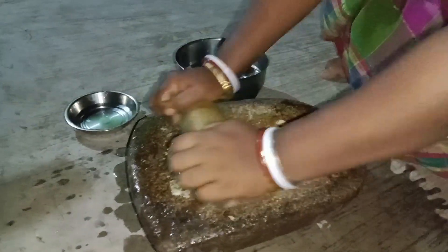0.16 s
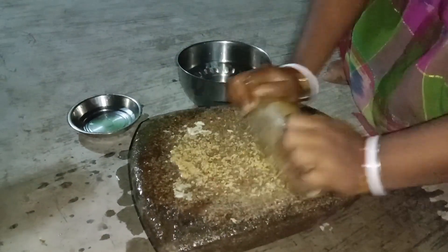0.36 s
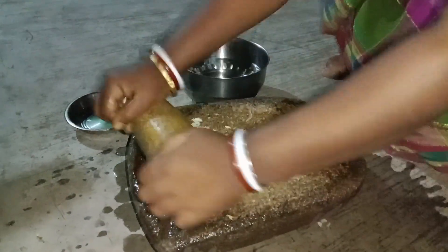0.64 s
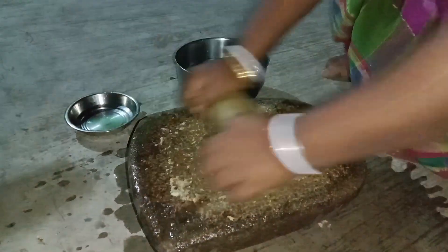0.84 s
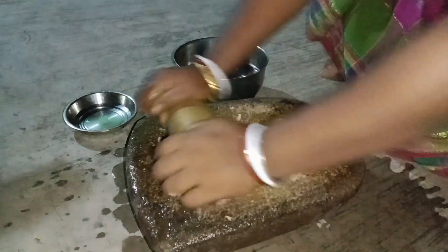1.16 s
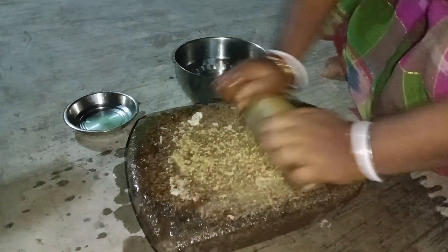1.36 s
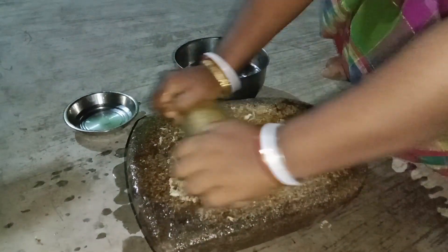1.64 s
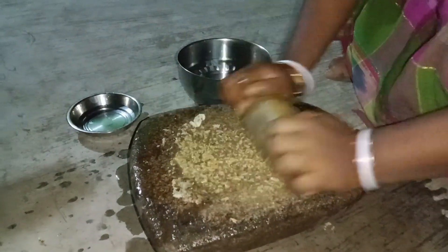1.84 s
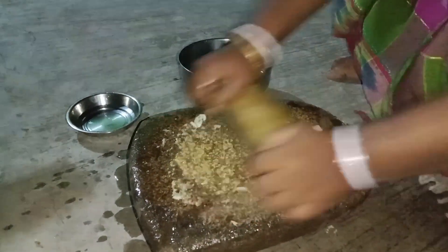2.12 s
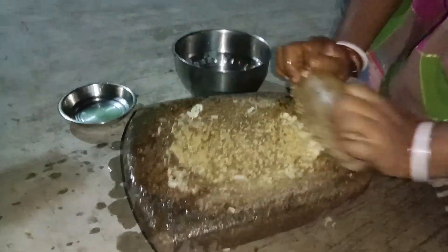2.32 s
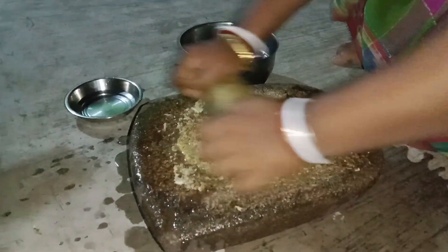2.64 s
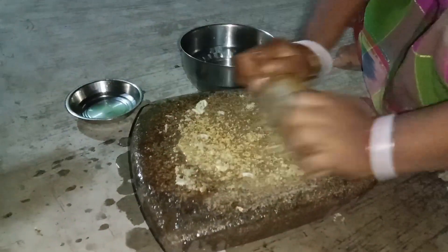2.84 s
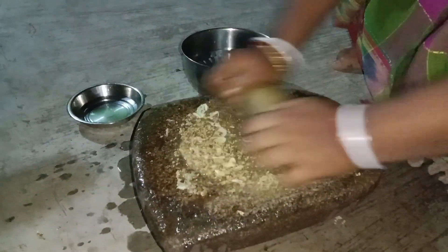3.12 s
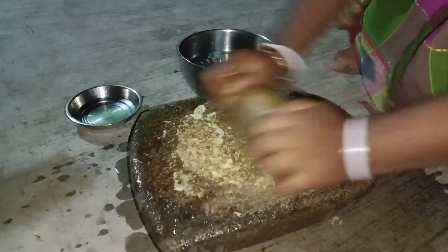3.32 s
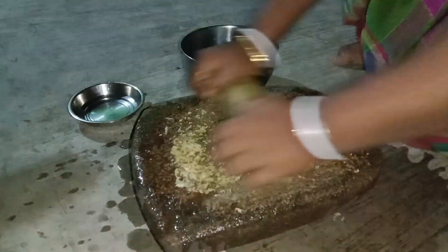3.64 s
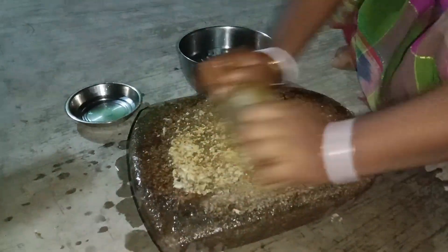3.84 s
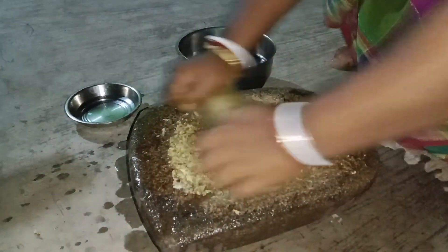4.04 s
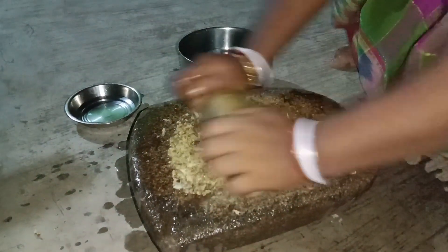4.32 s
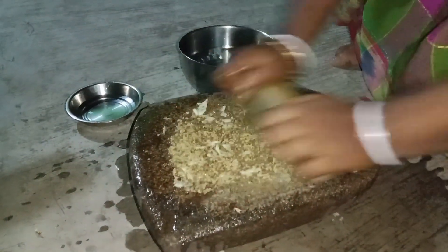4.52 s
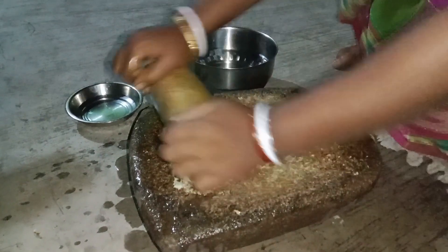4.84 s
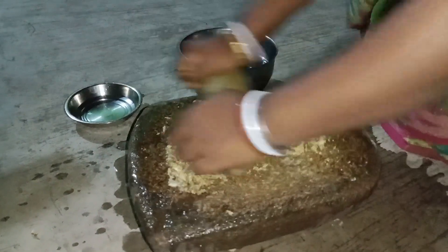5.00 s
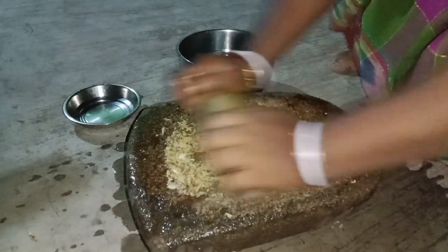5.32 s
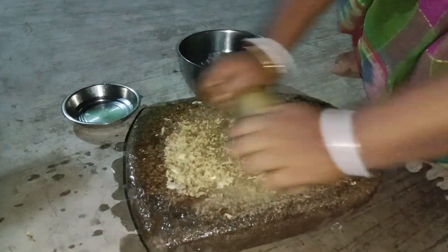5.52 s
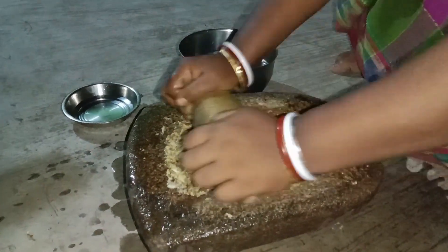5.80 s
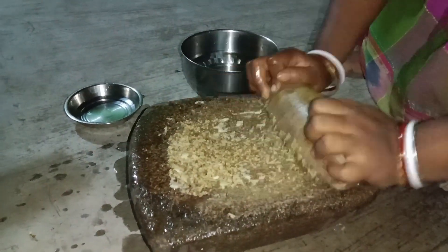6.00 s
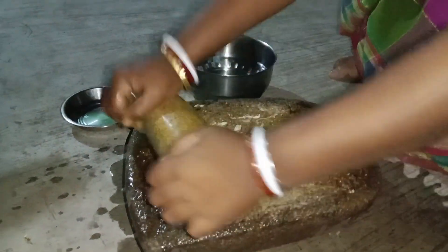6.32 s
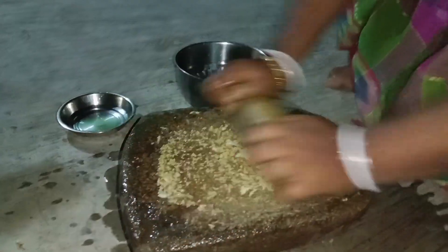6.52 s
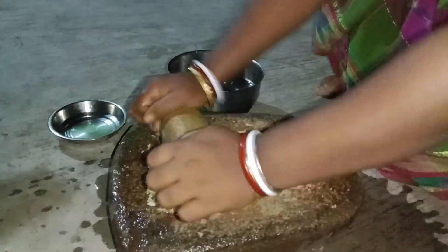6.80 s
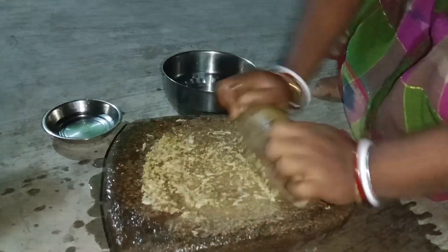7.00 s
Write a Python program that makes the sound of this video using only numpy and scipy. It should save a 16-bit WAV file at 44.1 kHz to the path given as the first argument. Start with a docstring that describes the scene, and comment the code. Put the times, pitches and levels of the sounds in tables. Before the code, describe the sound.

Hand grinding on stone, heard near and almost mono: short pushes and lighter pulls alternate, each a moist scrape with crunching grit and, on firm strokes, a low rumble. Hard knocks mark the roller landing, followed by dull thumps from the rocking slab. One longer groaning drag appears near the beginning, then scattered skids and a tiny bright bangle clink. Dry little room, quiet gaps, slightly muffled top.

```python
'''A small room with a hard floor, where a stone roller goes back and forth over a slab, crushing damp spices.
Each push swells, holds while the weight changes, and dies: noise and tiny clicks ring through colours
for hissing paste, crunching grit and rumbling slab. Knocks, skids and one long drag are noisy stone contacts.
The slab thumps as a short low tone, and bangles clink as a few fading high tones.
Faint hiss and a short echo surround it; a noise suppressor turns weak bands down.'''
import sys
import numpy as np
from scipy import signal
from scipy.fft import rfft, irfft
from scipy.io import wavfile
from scipy.ndimage import uniform_filter1d

SR = 44100
rng = np.random.default_rng(int(sys.argv[2]) if len(sys.argv) > 2 else 0)


def digitize_waveform(pressure):
    """Quantize a signal to 16-bit integers and store it at the path in sys.argv[1].

    Rows of a 2-D input are taken as channels; values are limited to [-1, 1].
    """
    field = np.atleast_2d(pressure).T
    bounded = np.clip(field, -1, 1)
    quanta = np.round(bounded * 32767).astype(np.int16)
    wavfile.write(sys.argv[1], SR, quanta)


N = 315756  # length in samples


def gain_of(db):
    """Turns decibels into a plain multiplier."""
    return 10 ** (np.asarray(db) / 20)


def evened(x):
    """Scales a sound to rms 1."""
    return x / np.sqrt(np.mean(x ** 2) + 1e-20)


def read(points, hz):
    """Reads a curve by straight lines between its points on a log-frequency axis."""
    f, value = np.transpose(points)
    return np.interp(np.log(hz + 1), np.log(f + 1), value)


def add(mix, s, sound):
    """Lays a sound into the mix at time s, in seconds."""
    start = max(round(s * SR), 0)
    part = mix[start:][:len(sound)]
    part += sound[:len(part)]


def response(colour, modes=(), size=8192):
    """Ring of a struck body with a broad colour and narrow resonances; it never starts before the blow."""
    hz = np.fft.rfftfreq(size, 1 / SR)
    db = read(colour, hz)
    for centre, width, height in modes:
        peak_power = gain_of(abs(height)) ** 2 - 1
        db = db + 10 * np.log10(1 + peak_power / (1 + (2 * (hz - centre) / width) ** 2))
    # folding the cepstrum packs the energy as early as it can be (minimum phase)
    cepstrum = irfft(np.log(gain_of(np.maximum(db, -100))))
    cepstrum[1:size // 2] *= 2
    cepstrum[size // 2 + 1:] = 0
    ring = irfft(np.exp(rfft(cepstrum)))[:size // 2]
    return ring / np.linalg.norm(ring)


def ring_through(drive, ring):
    """Lets a drive excite a body; the result has rms 1."""
    return evened(signal.oaconvolve(drive, ring)[:N])


def wobble(rate_hz):
    """Smooth chance of rms 1, fading out above the rate."""
    hz = np.fft.rfftfreq(N, 1 / SR)
    spectrum = rfft(rng.standard_normal(N)) * np.exp(-(hz / rate_hz) ** 2)
    return evened(irfft(spectrum, N))


def grains(per_s, spread_db, smooth_share):
    """Tiny fractures of very unequal size over a bed of smooth rubbing."""
    size = gain_of(spread_db * np.minimum(rng.exponential(1, N), 4))
    clicks = size * rng.choice([-1, 1], N) * (rng.random(N) < per_s / SR)
    share = np.clip(smooth_share, 0, 1)
    return np.sqrt(1 - share) * evened(clicks) + np.sqrt(share) * rng.standard_normal(N)


def wander(x, depth_db, patch_hz, patch_s, size=1024):
    """As the point of contact moves, it feeds some modes and starves others."""
    overlap = size * 3 // 4
    hz, t, z = signal.stft(x, SR, nperseg=size, noverlap=overlap)
    across, along = np.fft.fftfreq(len(hz), hz[1])[:, None], np.fft.fftfreq(len(t), t[1])
    blur = np.exp(-(across * patch_hz * 2) ** 2 - (along * patch_s * 2) ** 2)
    patches = evened(np.fft.ifft2(np.fft.fft2(rng.standard_normal(z.shape)) * blur).real)
    moved = z * gain_of(depth_db * patches)
    # each moment keeps its power
    moved *= np.linalg.norm(z, axis=0) / (np.linalg.norm(moved, axis=0) + 1e-20)
    return signal.istft(moved, SR, nperseg=size, noverlap=overlap)[1][:N]


def push(rise_s, hold_s, level_db, easing_db, rise_power, t60_s):
    """Strength of one hand movement: it builds, holds while the weight eases, and dies by 60 dB in t60_s."""
    rise_s, hold_s = max(rise_s, 1 / SR), max(hold_s, 1 / SR)
    t = np.arange(0, rise_s + hold_s + t60_s, 1 / SR)
    held = gain_of(level_db - easing_db * np.clip((t - rise_s) / hold_s, 0, 1))
    release = np.exp(-np.log(1000) * np.maximum(t - rise_s - hold_s, 0) / t60_s)
    return np.minimum(t / rise_s, 1) ** rise_power * held * release


def chatter(ring, hold_s, fall_s, size=3000):
    """One knock: a few milliseconds of rattling contact; its loudest moment has rms 1."""
    t = np.arange(size) / SR
    contacts = rng.standard_normal(size) * gain_of(5.4 * rng.standard_normal(size))
    strength = np.exp(-np.maximum(t - hold_s, 0) / fall_s)
    sound = signal.fftconvolve(contacts * strength, ring)
    return sound / np.sqrt(uniform_filter1d(sound ** 2, size=200).max())


def background():
    """A very faint hiss, strongest around 100 Hz and the microphone's treble peak."""
    # pitch_hz, level_db (relative)
    colour = [(30, -13.5), (100, 2.0), (300, -13.5), (1000, -16.5), (3200, -22.0), (4800, -39.5),
              (6000, -15), (7400, 0.5), (9300, -15), (12000, -18.5), (15500, -33.5)]
    return gain_of(-74.0) * ring_through(rng.standard_normal(N), response(colour))


# Pushes and pulls of the roller; a negative easing means the weight grows over the hold:
# [start_s, rise_s, hold_s, paste_db, grit_db, rumble_db, easing_db]
ROLLER_STROKES = [(0.0, 0.001, 0.032, -49.5, -47.5, -57, 9.5), (0.118, 0.065, 0.059, -58, -68.5, -78.5, -5),
                  (0.321, 0.052, 0.065, -47, -46.5, -38.5, 8.5), (0.509, 0.033, 0.13, -56, -69, -60.5, 10),
                  (0.646, 0.026, 0.057, -53, -60.5, -70, 0.5), (0.787, 0.021, 0.11, -67.5, -91, -90, 0),
                  (.94, 0.011, 0.056, -56.5, -57, -70.5, 14), (1.04, .02, 0.035, -71.5, -98, -97.5, -4),
                  (1.153, 0.032, 0.071, -48.5, -50, -44.5, 3), (1.264, .03, 0.023, -54, -58.5, -42.5, 2.5),
                  (1.329, 0.074, .26, -47, -51.5, -44.5, -2), (1.646, 0.029, 0.084, -56, -84, -39, 3),
                  (1.763, 0.018, 0.097, -45, -38.5, -32.5, 16.5),
                  (1.966, 0.045, 0.064, -50, -49, -41.5, 13.5),
                  (2.191, 0.064, 0.051, -53.5, -67, -65.5, -1), (2.282, 0.06, 0.09, -54.5, -72, -47, 29),
                  (2.479, 0.083, 0.083, -47, -46.5, -65, -3.5), (2.629, 0.025, 0.021, -60, -62.5, -48.5, 5),
                  (2.763, 0.048, 0.088, -50, -56, -83, -1.5), (2.97, 0.08, 0.024, -49, -49, -58.5, -6),
                  (3.16, 0.034, 0.077, -47, -35.5, -33.5, 22.5), (3.394, 0.045, 0.054, -49, -50.5, -38, 12),
                  (3.523, 0.034, 0.046, -69, -81, -77.5, 5), (3.687, 0.027, 0.14, -66.5, -72, -85, 11),
                  (3.945, 0.061, 0.077, -53, -59.5, -63, -0.5), (4.067, 0.038, 0.044, -52, -46.5, -41, 14),
                  (4.135, 0.036, 0.07, -43.5, -37, -38.5, 17), (4.381, 0.025, 0.054, -46.5, -45.5, -38, 5),
                  (4.54, 0.021, 0.13, -51, -54, -53, 18.5), (4.776, 0.04, 0.15, -50, -46.5, -33, 23),
                  (5.116, 0.032, 0.028, -45, -40, -41, 2), (5.249, 0.03, 0.068, -67.5, -88.5, -86, 9.5),
                  (5.345, 0.089, 0.037, -57, -61, -80, 0.5), (5.53, 0.034, .08, -47.5, -40.5, -36.5, 16),
                  (5.651, .02, 0.056, -59.5, -69, -82, 11), (5.782, .07, 0.049, -55, -65.5, -72.5, 3.5),
                  (5.956, 0.025, 0.097, -52, -62.5, -56.5, 8.5), (6.1, 0.021, 0.027, -66.5, -85, -87.5, 4),
                  (6.218, 0.13, 0.049, -52.5, -59, -70, -1), (6.44, 0.011, 0.085, -64, -81, -86.5, 0.5),
                  (6.547, 0.034, 0.12, -64.5, -71.5, -95, 10), (6.769, 0.054, 0.084, -57, -66, -70, 1.5),
                  (6.929, 0.07, 0.092, -50, -48, -42, 31)]
PASTE_T60_S, GRIT_T60_S, RUMBLE_T60_S = .17, .12, .12  # how each dies as the roller stops
# shares of the easing that paste and grit follow; the rumble follows all of it
PASTE_EASING, GRIT_EASING = 0.13, 0.84
# the roller never quite rests between strokes
IDLE_PASTE_DB, IDLE_GRIT_DB, IDLE_RUMBLE_DB = -79, -100, -94.5
# levels grow as these powers of time: hiss first, weight last
PASTE_RISE_POWER, GRIT_RISE_POWER, RUMBLE_RISE_POWER = 0.98, 1.6, 3.5
PASTE_LINGER_S = 0.0065  # the paste still smears after the weight has come off


def stroke_levels():
    """Levels in dB of paste, grit and rumble: one push drives all three."""
    idle_levels = (IDLE_PASTE_DB, IDLE_GRIT_DB, IDLE_RUMBLE_DB)
    paste, grit, rumble = (np.full(N, gain_of(db) ** 2) for db in idle_levels)
    for s, rise_s, hold_s, paste_db, grit_db, rumble_db, easing_db in ROLLER_STROKES:
        smear = push(rise_s, hold_s + PASTE_LINGER_S, paste_db, PASTE_EASING * easing_db,
                     PASTE_RISE_POWER, PASTE_T60_S)
        crunch = push(rise_s, hold_s, grit_db, GRIT_EASING * easing_db, GRIT_RISE_POWER, GRIT_T60_S)
        weight = push(rise_s, hold_s, rumble_db, easing_db, RUMBLE_RISE_POWER, RUMBLE_T60_S)
        # overlapping strokes add as power
        add(paste, s, smear ** 2)
        add(grit, s, crunch ** 2)
        add(rumble, s, weight ** 2)
    return 10 * np.log10([paste, grit, rumble])


# Colours of the rubbing, each only a balance of low and high: [pitch_hz, level_db (per Hz, relative)]
# hiss of damp paste
PASTE_COLOUR = [(4700, -41), (5250, -24), (5800, -23.5), (6150, -17), (6550, -5.5), (7400, 1), (8150, -6.5),
                (8750, -14), (9400, -24), (10200, -15.5), (12700, -15.5), (14200, -24), (15800, -28)]
# crunch of grit
GRIT_COLOUR = [(940, -29), (1600, -4.5), (1880, -1), (2160, -6.5), (2340, 0.5), (2520, 5.5), (3320, 0),
               (3630, -8.5), (3900, -5.5), (4280, -17.5), (4810, -49), (4900, -38.5), (6370, -68.5),
               (10800, -120)]
# middle of the slab's voice
BODY_COLOUR = [(160, -35.5), (280, -8.5), (435, -7), (499, 2), (563, 3), (658, 0.5), (921, -9.5),
               (995, -8.5), (1130, -6.5), (1510, -6.5), (2200, -18), (2860, -41), (4840, -120)]
# the slab's upper modes under a light rub
LIGHT_COLOUR = [(600, -23.5), (940, 4.5), (1150, -8), (1350, -3.5), (1850, -7.5), (3000, -39.5)]
# low rumble of the slab
RUMBLE_COLOUR = [(15, -52), (25, -32.5), (160, 1), (202, -3.5), (314, -13), (400, -17.5), (520, -48.5),
                 (880, -120)]
# sharp snap of husks and seeds, also used by the knocks
SNAP_COLOUR = [(2650, -51), (4500, -13), (4870, -33.5), (5670, -13.5), (6780, 0), (8060, 2), (8370, -0.5),
               (9390, -15), (10700, -10), (12500, -10), (14200, -20.5), (15300, -17), (15800, -32)]
# Resonances of the slab, the roller and the floor beneath, varied by the knocks:
# [pitch_hz, width_hz, height_db (above the broad colour)]
STONE_MODES = [(97, 29, 5), (146, 7.6, 5.5), (213, 16, 5), (310, 31, 1.5), (368.6, 6, 3.5),
               (496.7, 2.5, 7.5), (692, 25, 8), (957, 67, 6), (1032, 19, 3), (1563, 24, 4.5), (2017, 14, 6),
               (2620, 5.7, 4), (3146, 77, 4), (3376, 39, 5.5), (3846, 13, 12)]


def grinding(paste_db, grit_db, rumble_db):
    """Paste, grit and the slab's middle voice judder together as the roller rides over lumps."""
    lumps = wobble(rate_hz=34)
    paste = ring_through(grains(per_s=1100, spread_db=4.0, smooth_share=0.66), response(PASTE_COLOUR))
    grit = ring_through(grains(per_s=350, spread_db=2.0, smooth_share=0.57),
                        response(GRIT_COLOUR, STONE_MODES))
    catches = grains(per_s=590, spread_db=7.0, smooth_share=0.28)
    body = ring_through(catches, response(BODY_COLOUR, STONE_MODES))
    light = ring_through(catches, response(LIGHT_COLOUR))
    rumble = ring_through(grains(per_s=400, spread_db=3.5, smooth_share=0.45),
                          response(RUMBLE_COLOUR, STONE_MODES))
    # now and then a husk bursts, with a crackle about a millisecond long
    burst = rng.standard_normal(200) * np.exp(-np.arange(200) / 45)
    husks = ring_through(grains(per_s=70, spread_db=3.5, smooth_share=0),
                         np.convolve(burst, response(SNAP_COLOUR)))
    paste = wander(paste, depth_db=1.5, patch_hz=500, patch_s=0.023)
    paste = paste + gain_of(-19) * husks
    grit = wander(grit + gain_of(-12.5) * light, depth_db=5.5, patch_hz=166, patch_s=0.096)
    body = wander(body, depth_db=5, patch_hz=150, patch_s=.06)
    # the middle of the slab's voice needs both grit to catch on and weight behind it
    body_db = 0.36 * grit_db + 0.68 * rumble_db - 2.16
    return (paste * gain_of(paste_db + 1.7 * lumps)
            + grit * gain_of(grit_db + 3.9 * lumps)
            + body * gain_of(body_db + 0.6 * lumps)
            + rumble * gain_of(rumble_db))


# The roller lands and seeds snap under it; levels are before the trims in the function:
# [start_s, clack_db (slab), crack_db (roller), snap_db (seed), pitch_hz (strongest ring of the crack)]
ROLLER_KNOCKS = [(0.001, -85, -45, -40.5, 2400), (0.338, -53.5, -36.5, -37.5, 3480),
                 (0.348, -20.5, -28, -28.5, 2580), (0.527, -74, -40, -41.5, 1530),
                 (0.951, -55.5, -39, -42, 2750), (1.284, -42.5, -79, -70, 1700),
                 (1.31, -47, -36, -68, 1970), (1.347, -42.5, -43, -56, 1970),
                 (1.369, -29.5, -38.5, -47, 3050), (1.572, -48.5, -36.5, -43, 2600),
                 (1.778, -19, -20.5, -21.5, 2700), (1.79, -24, -36, -48, 2440),
                 (1.888, -55, -58, -44, 3380), (2.297, -29, -68, -65, 1850), (2.38, -28.5, -68, -44, 1700),
                 (2.883, -68, -50, -48, 3180), (3.185, -23.5, -35, -33, 1850), (3.406, -59, -46, -35, 1960),
                 (3.427, -23.5, -38, -47, 1860), (3.973, -72, -62.5, -40.5, 3130),
                 (4.086, -34.5, -43, -66, 1840), (4.1658, -31, -25.5, -29.5, 3570),
                 (4.387, -72, -42, -44, 2130), (4.403, -27.5, -36, -25.5, 3100),
                 (4.5588, -34.5, -37, -43, 2850), (4.793, -61.5, -33.5, -36, 2400),
                 (4.8057, -16, -27, -25, 2820), (4.822, -39.5, -31, -34, 2360),
                 (5.044, -81, -59, -50.5, 3390), (5.149, -25, -32.5, -33.5, 2470),
                 (5.509, -63, -78, -71, 2500), (5.543, -76.5, -41, -57, 3100),
                 (5.565, -35.5, -38, -45, 1690), (5.978, -77, -27.5, -57, 2650),
                 (5.997, -77, -36.5, -71, 2730), (6.267, -47, -56.5, -55.5, 2580),
                 (6.788, -75.5, -60.5, -59, 1960), (6.917, -54, -84.5, -69, 2520),
                 (6.938, -66, -49, -60, 3080), (6.98, -38, -30.5, -37, 2790)]
# Colours of a landing: [pitch_hz, level_db (per Hz, relative)]
# the slab's clack
CLACK_COLOUR = [(110, -40.5), (180, -5), (323, -10), (478, -6.5), (783, -12.5), (961, -2), (1030, -7.5),
                (1150, -12.5), (1350, -12), (1530, -5.5), (1710, -12.5), (1970, -20), (2100, -20),
                (2730, -52), (4620, -120)]
# the roller's crack
CRACK_COLOUR = [(880, -33), (1500, -22.5), (1710, -20.5), (1870, 2), (2140, -3), (2630, 0), (2870, -3.5),
                (3410, -0.5), (3920, -18), (4220, -23), (4900, -41), (6370, -71.5), (10800, -120)]


def knocking():
    """Each landing rings the slab, the roller and, for an instant, the crushed seed between them."""
    seed, out = response(SNAP_COLOUR), np.zeros(N)
    for s, clack_db, crack_db, snap_db, ring_hz in ROLLER_KNOCKS:
        # the spot that is struck favours some modes over others
        favour_db = 1.1 * rng.standard_normal(len(STONE_MODES))
        # the pressed roller damps them: doubled widths ring only briefly
        modes = [(hz, 2 * width, max(db + more, 0))
                 for (hz, width, db), more in zip(STONE_MODES, favour_db)]
        slab = response(CLACK_COLOUR, modes)
        roller = response(CRACK_COLOUR, modes + [(ring_hz, 150, 12)])
        add(out, s, gain_of(clack_db - 4.0) * chatter(slab, hold_s=0.0035, fall_s=0.0079))
        add(out, s, gain_of(crack_db + 0.34) * chatter(roller, hold_s=0.0037, fall_s=0.0045))
        add(out, s, gain_of(snap_db - 4.0) * chatter(seed, hold_s=0.001, fall_s=0.0055))
    return out


# The slab rocks and thumps on the floor: [start_s, level_db (before a 3 dB lift), pitch_hz]
SLAB_THUMPS = [(0.362, -38.5, 155.5), (1.215, -51, 157), (1.299, -38.5, 150), (1.798, -38.5, 223),
               (2.022, -38.5, 158.5), (2.645, -43, 147.4), (3.053, -45.5, 219.6), (3.204, -45, 181),
               (3.423, -34.5, 148.5), (4.096, -39, 229), (4.421, -35, 152.4), (4.569, -43.5, 150),
               (4.799, -41, 182), (5.139, -36.5, 245), (5.561, -35, 214), (6.002, -39.5, 149),
               (6.998, -37, 177)]


def thumping(size=6000):
    """The heavy slab bounces on the floor: a low tone that swells softly and dies in a few cycles."""
    t, out = np.arange(size) / SR, np.zeros(N)
    swell = (1 - np.exp(-(t / 0.014) ** 2)) * np.exp(-t / 0.013)
    for s, level_db, pitch_hz in SLAB_THUMPS:
        tone = np.sin(2 * np.pi * pitch_hz * t)
        add(out, s, gain_of(level_db + 3.0) * swell / swell.max() * tone)
    return out


# The roller skids on bare stone; the lighter the touch, the higher its low edge:
# [start_s, rise_s, hold_s, level_db, easing_db, low_edge_hz]
STONE_SKIDS = [(0.662, 0.0086, 0.056, -40.5, -9, 288), (2.187, 0.026, 0.01, -52, 2, 600),
               (2.218, 0.021, 0.11, -33, 1, 450), (2.375, 0.019, 0.0055, -34.5, -1, 487),
               (2.507, 0.0092, 0.043, -40, -8, 546), (3.697, 0.014, .1, -66.5, 8, 650),
               (4.898, 0.033, .025, -29.5, 7.5, 365), (5.104, 0.017, 0.022, -44, -6, 510),
               (6.291, 0.047, 0.062, -31.5, 1, 667), (6.806, 0.032, 0.057, -70, 0, 600)]
# Broad colour of a skid: [pitch_hz, level_db (per Hz, relative)]
SKID_COLOUR = [(160, -72), (280, -26), (334, -15.5), (499, -3.5), (703, -11), (782, -12.5), (922, -9.5),
               (1270, -2), (1570, -9), (2160, -10.5), (2370, -8.5), (3150, -33.5), (3540, -73), (4080, -51),
               (4700, -83), (6110, -110), (10300, -120)]
# Resonances that a skid brings out: [pitch_hz, width_hz, height_db (above the colour, sign ignored)]
RASP_MODES = [(500.4, 7.3, -8), (708, 83, 8.5), (906, 35, 15.5), (982, 30, 11), (1510, 80, 5.5),
              (2235, 21, 16), (2636, 185, 9.5)]
# Faint upper partials of a skid: [pitch_hz, level_db (per Hz, relative)]
SKID_TOP_COLOUR = [(5200, -40), (5750, 26), (5980, 42), (6300, -17), (9500, -60), (11600, 26.5),
                   (13000, -44)]
SKID_RISE_POWER, SKID_T60_S = 1.76, 0.072


def skidding():
    """Stone sticks and slips on stone in quick, uneven jerks."""
    slips = grains(per_s=1100, spread_db=2.5, smooth_share=0.55)
    slips = slips * gain_of(0.25 * wobble(rate_hz=1900))
    rasp = ring_through(slips, response(SKID_COLOUR, RASP_MODES))
    rasp = rasp + gain_of(-20) * ring_through(slips, response(SKID_TOP_COLOUR))
    rasp = wander(rasp, depth_db=5.0, patch_hz=143, patch_s=0.11)
    out = np.zeros(N)
    for s, rise_s, hold_s, level_db, easing_db, edge_hz in STONE_SKIDS:
        contact = push(rise_s, hold_s, level_db, easing_db, SKID_RISE_POWER, SKID_T60_S)
        low_cut = signal.butter(4, edge_hz, "highpass", fs=SR, output="sos")
        piece = rasp[round(s * SR):][:len(contact)]
        add(out, s, contact * signal.sosfilt(low_cut, piece))
    return out


# Bangles clink on a wrist: [start_s, level_db]
BANGLE_CLINKS = [(1.346, -48.5), (2.7113, -36.5), (2.725, -52)]
# Tones the bangles ring with: [pitch_hz, level_db (relative), t60_s (time to fade by 60 dB)]
BANGLE_TONES = [(7830, 1, .07), (8840, 3.5, 0.082), (11140, -1.5, 0.084), (12700, 13, 0.028),
                (11300, -24, .04), (13230, -4, 0.02)]


def clinking(size=5000):
    """Bangles chatter together and ring briefly, damped by the wrist."""
    t, out = np.arange(size) / SR, np.zeros(N)
    ring = np.zeros(size)
    for hz, db, t60_s in BANGLE_TONES:
        fade = np.exp(-np.log(1000) * t / t60_s)
        ring += gain_of(db) * fade * np.sin(2 * np.pi * hz * t)
    ring = ring * (1 - np.exp(-t / 0.00011))  # the ring takes a moment to build
    for s, level_db in BANGLE_CLINKS:
        add(out, s, gain_of(level_db) * chatter(ring, hold_s=0.001, fall_s=0.00184))
    return out


# Colour of the heavy drag: [pitch_hz, level_db (per Hz, relative)]
HEAVY_COLOUR = [(25, -29.5), (55, -1.5), (75, -7), (130, -21), (215, -1.5), (265, -16.5), (330, 4.5),
                (420, -2), (560, -11.5), (700, -9.5), (860, -14), (1300, -7.5), (2300, -13.5),
                (3000, -23.5), (3600, -35.5), (4700, -77)]
# one long, heavy drag across the pitted face, shaped like any other push
DRAG_START_S, DRAG_RISE_S, DRAG_HOLD_S, DRAG_T60_S = 1.412, 0.034, 0.2, 0.27
DRAG_DB, DRAG_EASING_DB = -30, 1


def dragging():
    """Under full weight the roller bumps densely over the pits of the slab."""
    bumps = grains(per_s=1600, spread_db=4.5, smooth_share=.45)
    # pitch_hz, width_hz, height_db
    modes = [(78, 5.7, 2.6), (234, 9.1, 13), (328, 2.9, 10.0), (410, 6.2, 11.0), (696, 23, 9.6)]
    groan = ring_through(bumps, response(HEAVY_COLOUR, modes))
    weight = np.zeros(N)
    add(weight, DRAG_START_S, push(DRAG_RISE_S, DRAG_HOLD_S, DRAG_DB, DRAG_EASING_DB,
                                   SKID_RISE_POWER, DRAG_T60_S))
    return weight * wander(groan, depth_db=4.5, patch_hz=199, patch_s=0.021)


# How long the room's echo takes to fade by 60 dB: [pitch_hz, t60_s]
ROOM_FADE = [(100, 0.074), (1000, 0.19), (3000, 0.082), (12000, 0.042)]


def room(x, size=16384):
    """A short tail from the floor and near walls, its treble dying soonest."""
    taps = rng.standard_normal(size) * (np.arange(size) / SR > .006)  # first echo after 6 ms
    hz, t, z = signal.stft(taps, SR, nperseg=256)
    fade = np.exp(-np.log(1000) * t / read(ROOM_FADE, hz)[:, None])
    tail = signal.istft(z * fade, SR)[1]
    return signal.oaconvolve(x, tail / np.linalg.norm(tail))[:N]


def suppress(x, threshold_db, depth_db, size=1024):
    """A noise suppressor: bands that stay weak are turned down, by depth_db at most."""
    overlap = size * 3 // 4
    z = signal.stft(x, SR, nperseg=size, noverlap=overlap)[2]
    power = (abs(z) ** 2).mean(0)  # both channels share one decision
    power = uniform_filter1d(power, size=4, axis=0)  # over neighbouring bands
    power = uniform_filter1d(power, size=5, axis=1)  # over neighbouring moments
    opening = abs(power) / (abs(power) + gain_of(threshold_db) ** 2)
    z = z * np.maximum(opening, gain_of(depth_db))
    return signal.istft(z, SR, nperseg=size, noverlap=overlap)[1][:, :N]


def scene():
    """All comes from one spot; only the treble of knocks and clinks differs a little between the sides."""
    paste_db, grit_db, rumble_db = stroke_levels()
    rub = grinding(paste_db, grit_db, rumble_db) + dragging()
    skid = skidding()
    knock = knocking() + clinking()
    echo = room(gain_of(-32.0) * rub + gain_of(-21.5) * skid + gain_of(-17) * knock)
    mid = rub + skid + knock + thumping() + echo + background()
    treble = signal.butter(6, 5000, "highpass", fs=SR, output="sos")
    side = gain_of(-26) * signal.sosfilt(treble, knock)
    return np.array([mid + side, mid - side])


EDGE_HZ = 15800  # upper limit of the recorder


def record(dry):
    """The recorder's noise suppressor, then its band limit."""
    low_pass = signal.firwin(401, EDGE_HZ, window=("kaiser", 8), fs=SR)
    quieted = suppress(dry, threshold_db=-94.0, depth_db=-4.5)
    return signal.oaconvolve(quieted, low_pass[None], "same", axes=1)


dry = scene()
out = record(dry)
digitize_waveform(out)
```